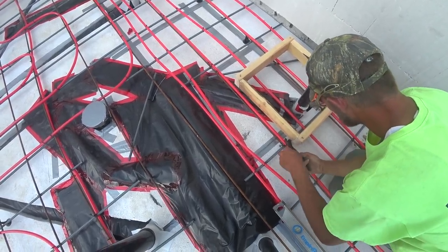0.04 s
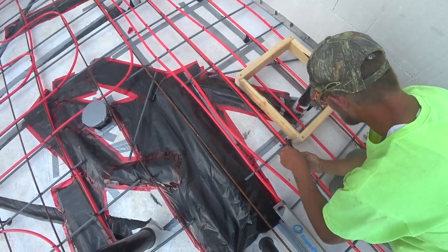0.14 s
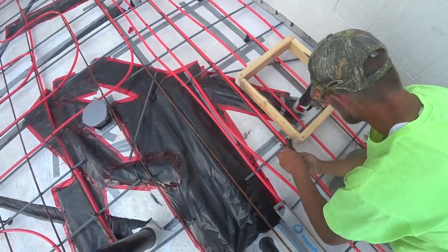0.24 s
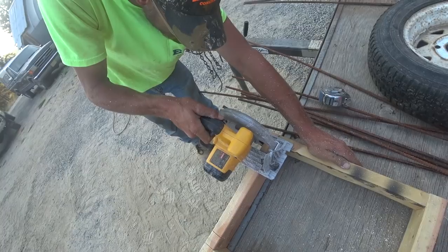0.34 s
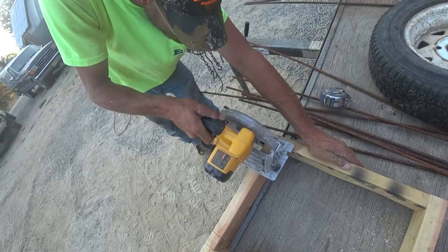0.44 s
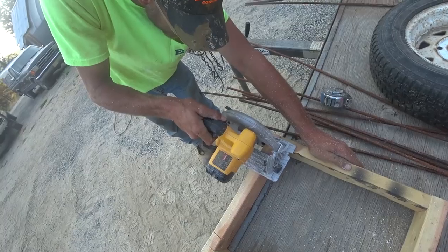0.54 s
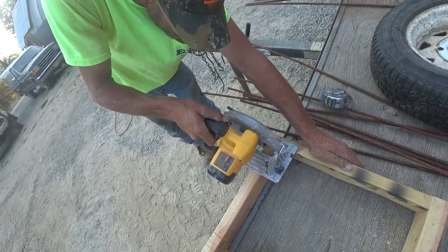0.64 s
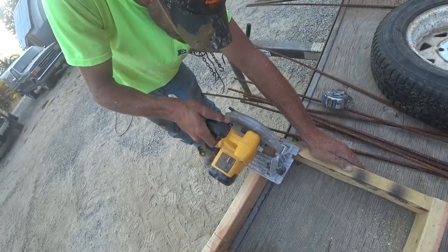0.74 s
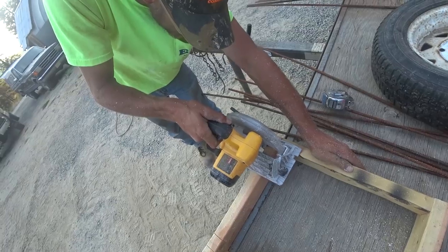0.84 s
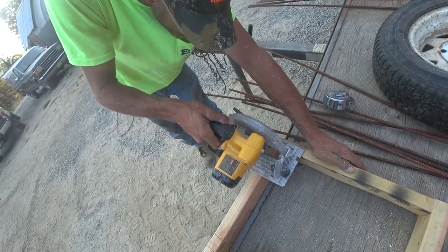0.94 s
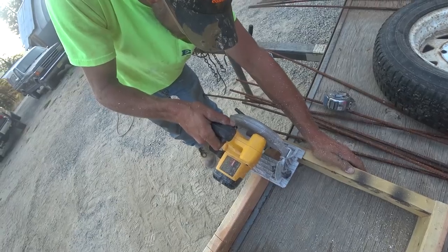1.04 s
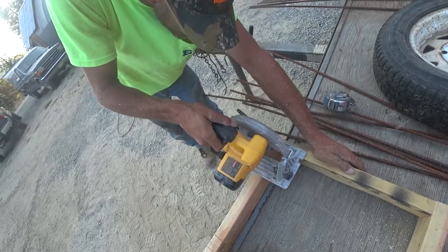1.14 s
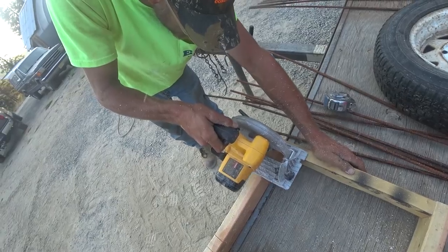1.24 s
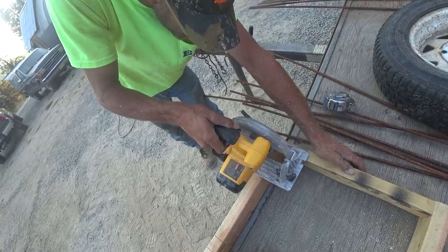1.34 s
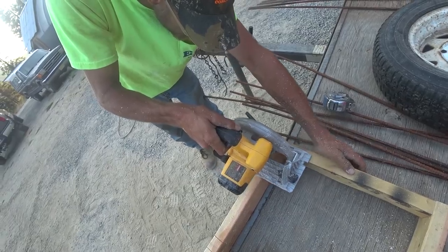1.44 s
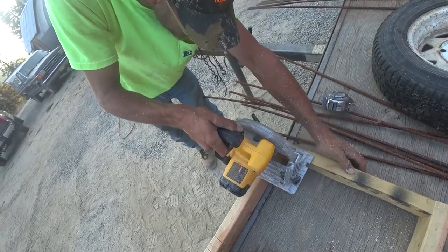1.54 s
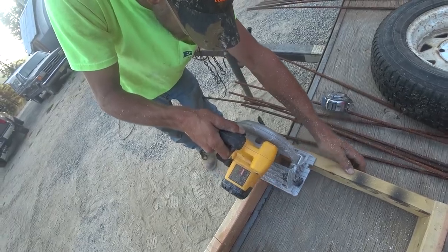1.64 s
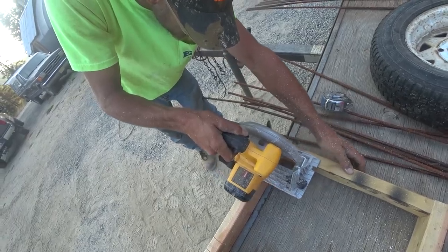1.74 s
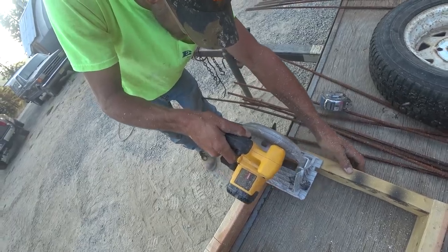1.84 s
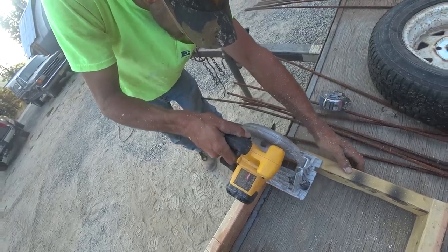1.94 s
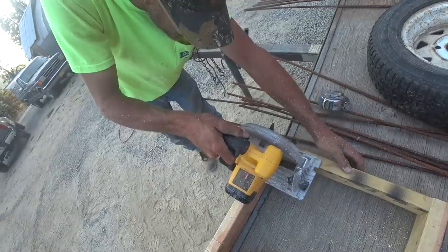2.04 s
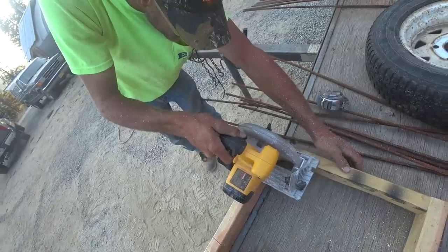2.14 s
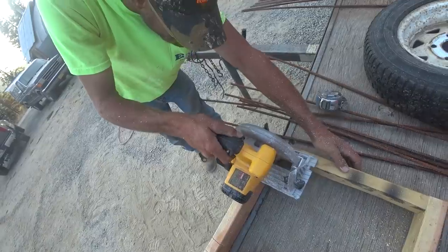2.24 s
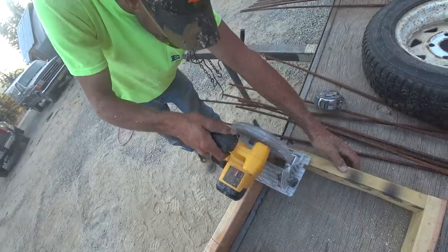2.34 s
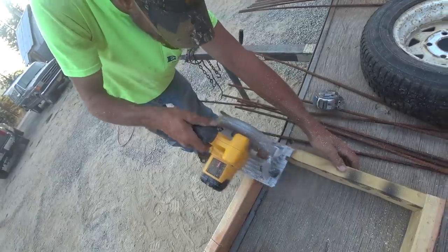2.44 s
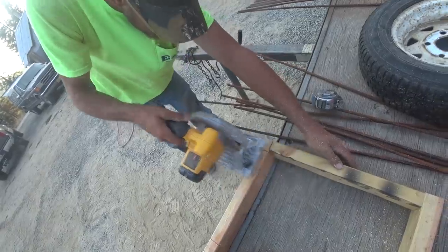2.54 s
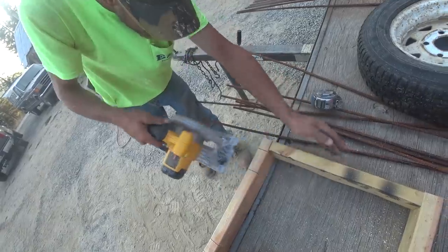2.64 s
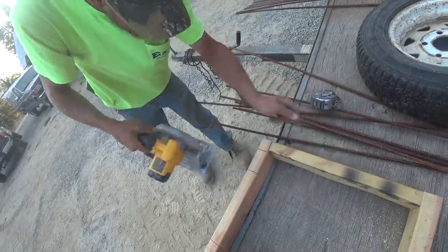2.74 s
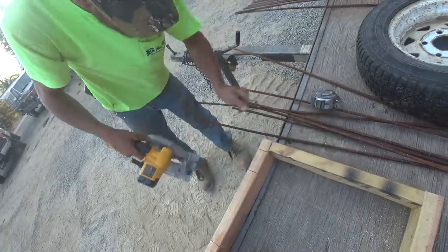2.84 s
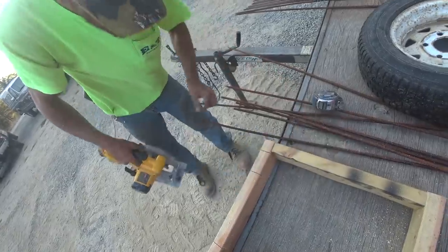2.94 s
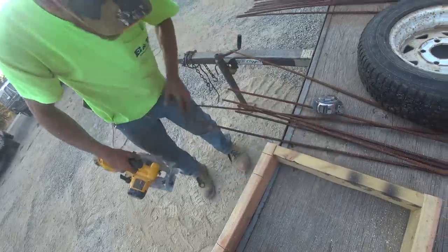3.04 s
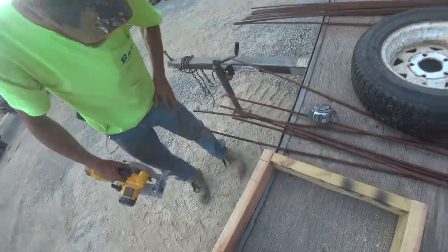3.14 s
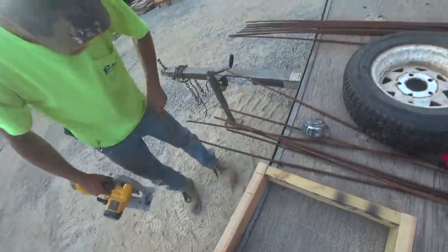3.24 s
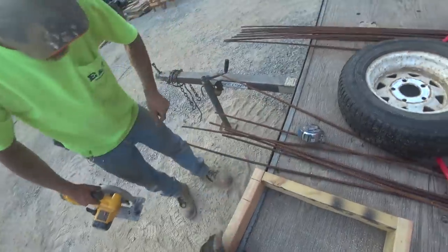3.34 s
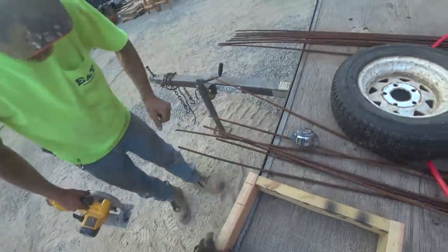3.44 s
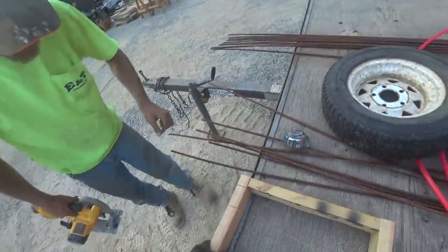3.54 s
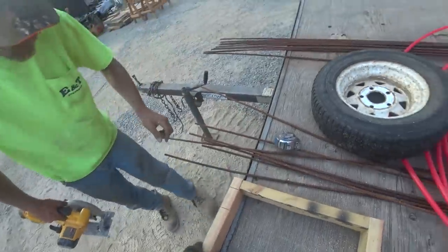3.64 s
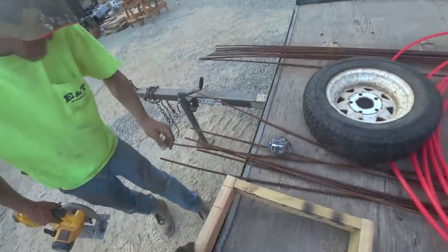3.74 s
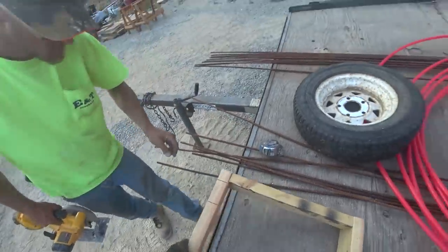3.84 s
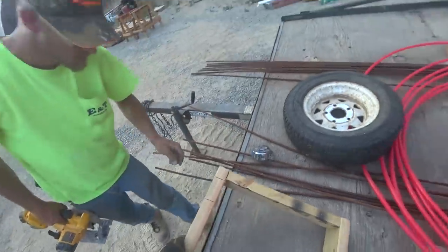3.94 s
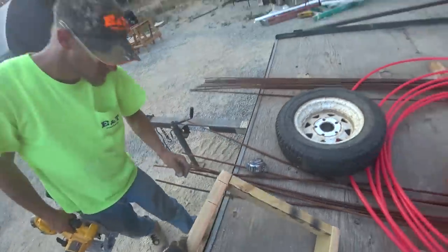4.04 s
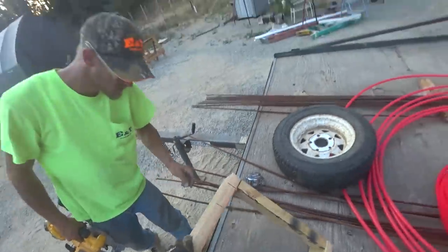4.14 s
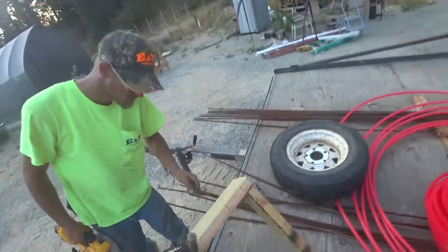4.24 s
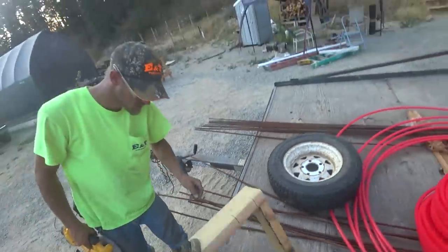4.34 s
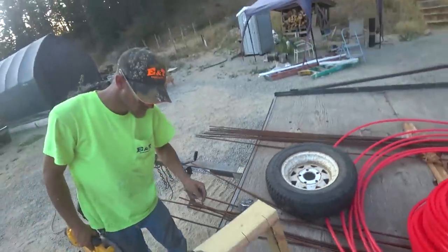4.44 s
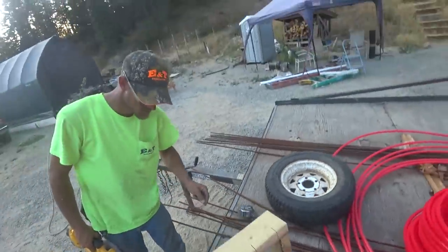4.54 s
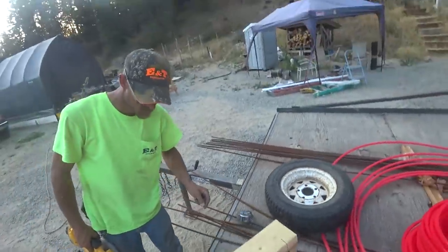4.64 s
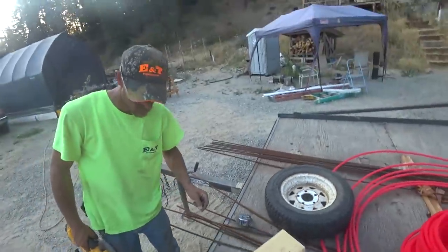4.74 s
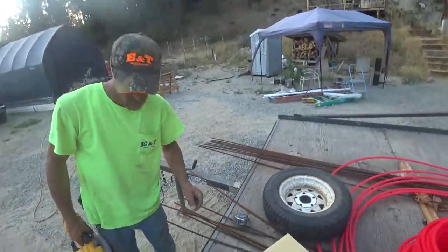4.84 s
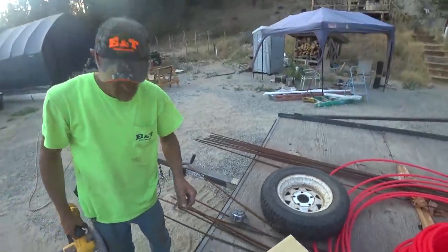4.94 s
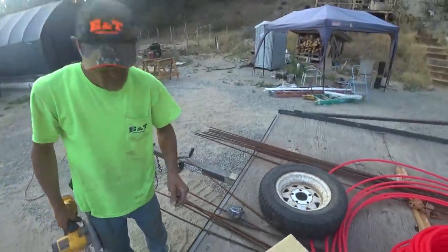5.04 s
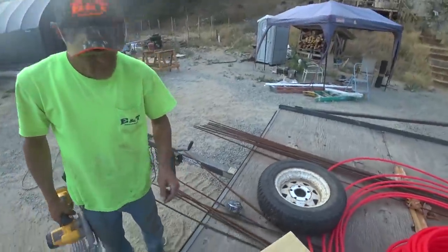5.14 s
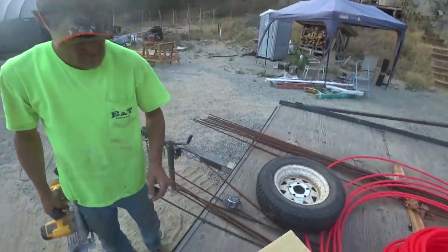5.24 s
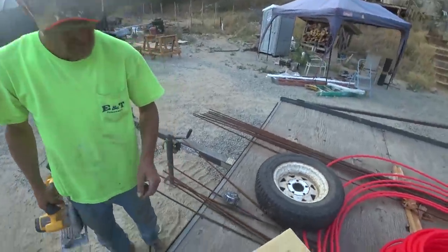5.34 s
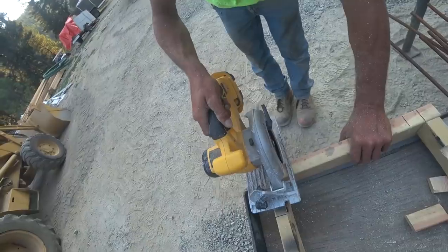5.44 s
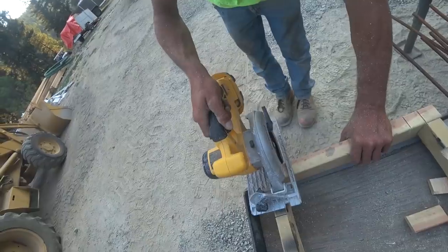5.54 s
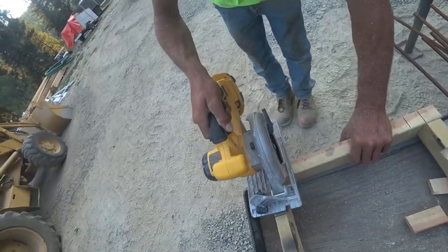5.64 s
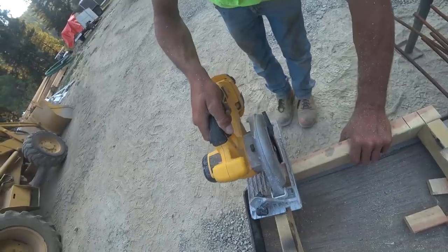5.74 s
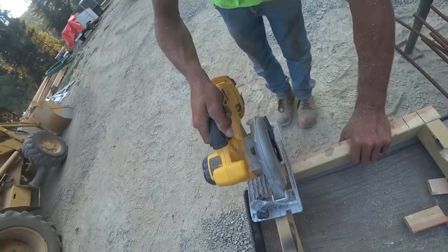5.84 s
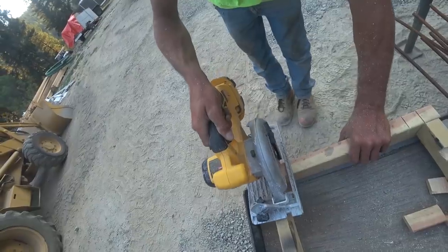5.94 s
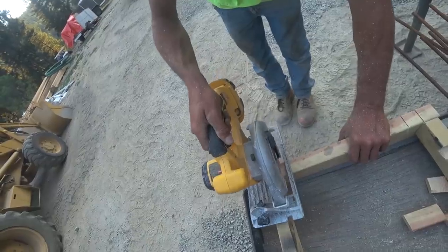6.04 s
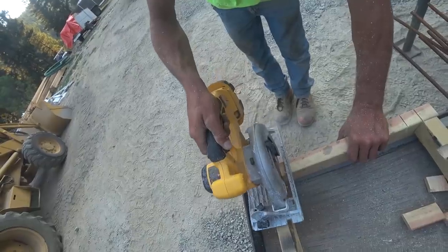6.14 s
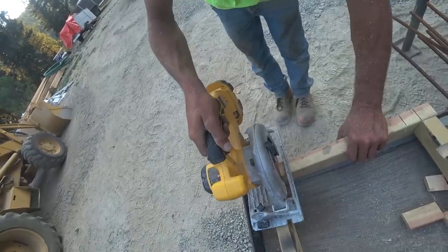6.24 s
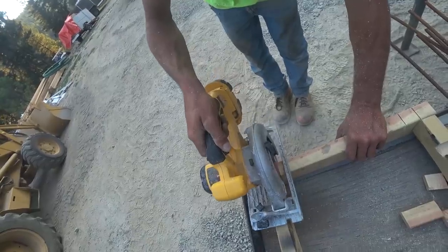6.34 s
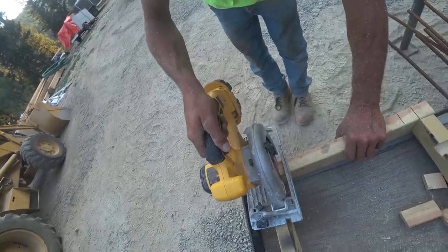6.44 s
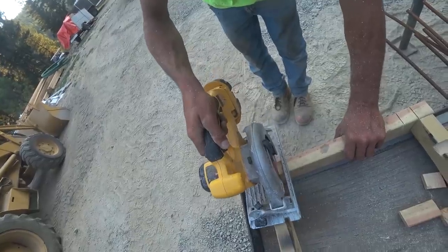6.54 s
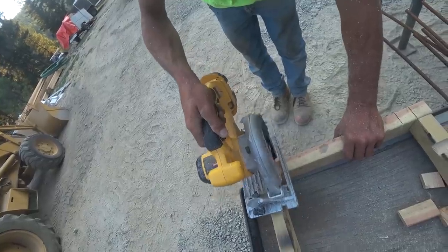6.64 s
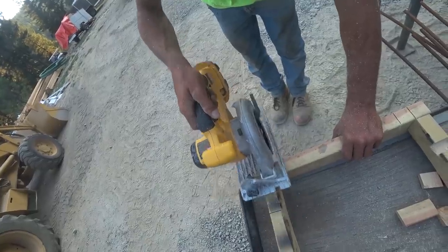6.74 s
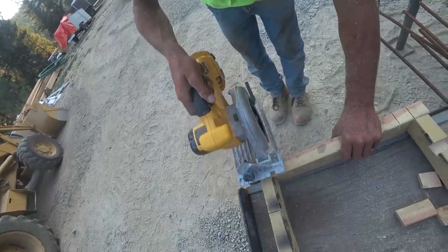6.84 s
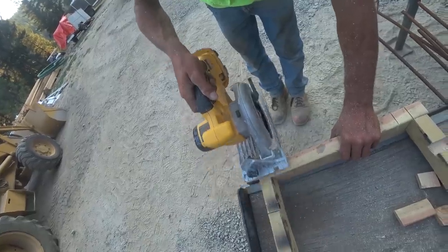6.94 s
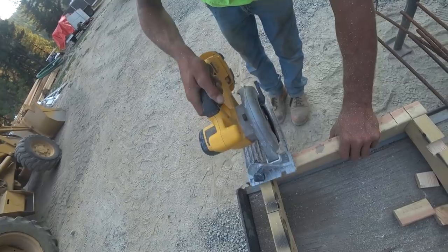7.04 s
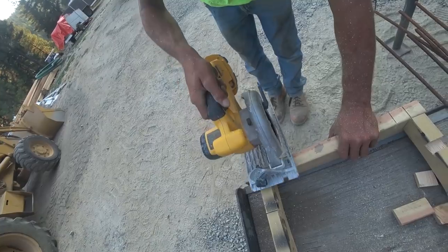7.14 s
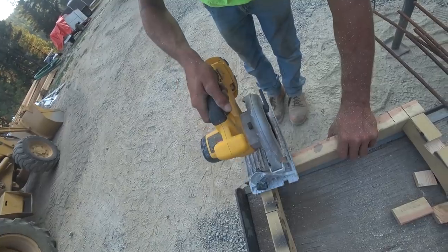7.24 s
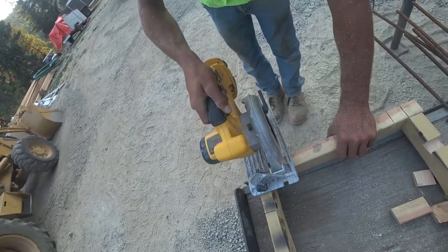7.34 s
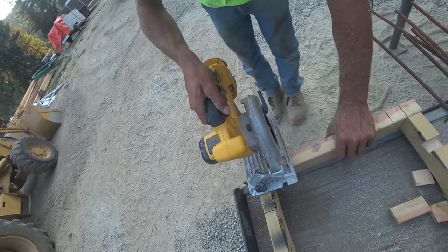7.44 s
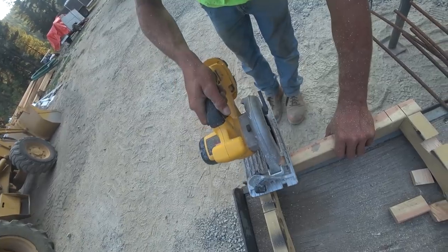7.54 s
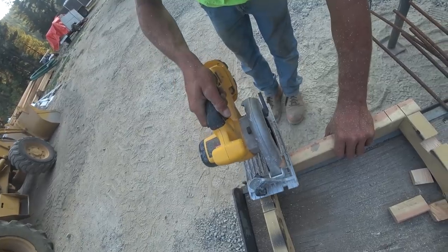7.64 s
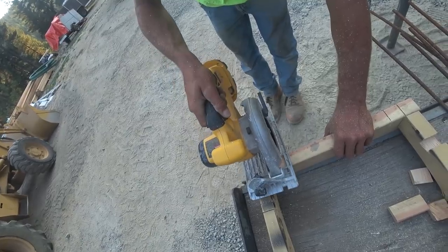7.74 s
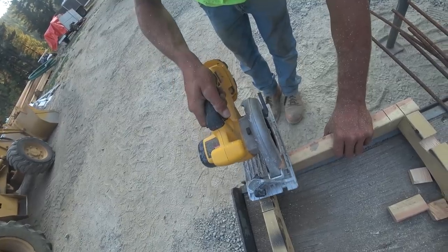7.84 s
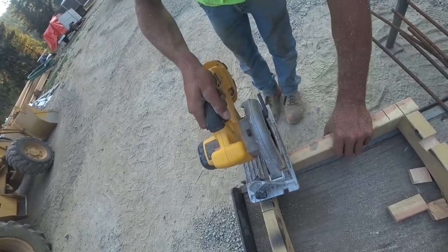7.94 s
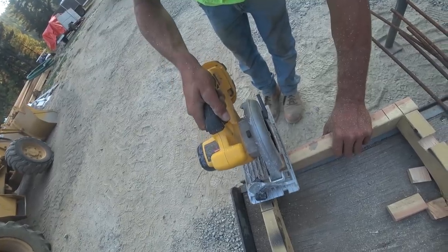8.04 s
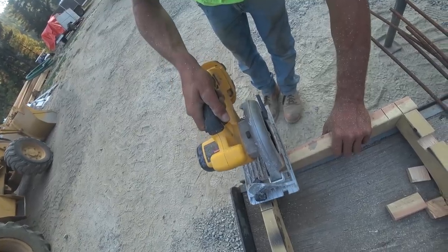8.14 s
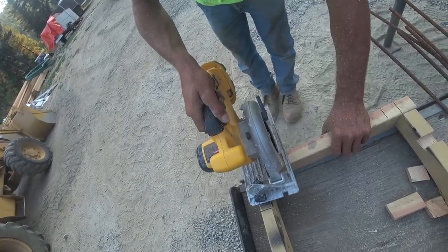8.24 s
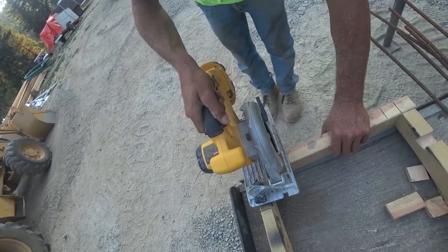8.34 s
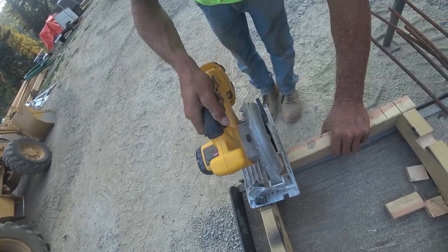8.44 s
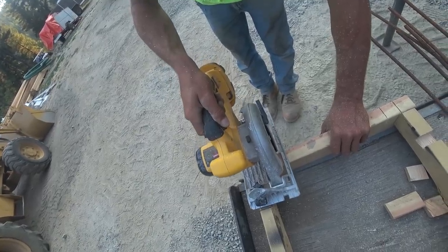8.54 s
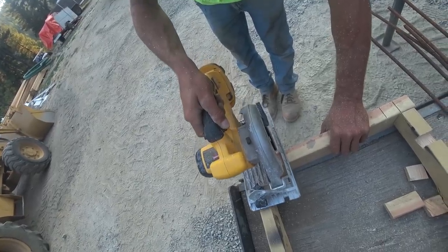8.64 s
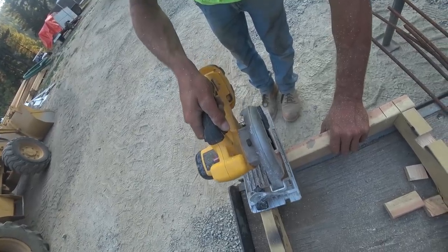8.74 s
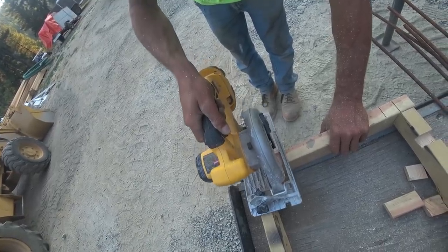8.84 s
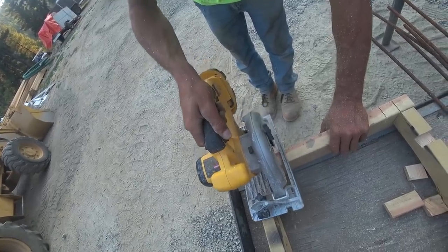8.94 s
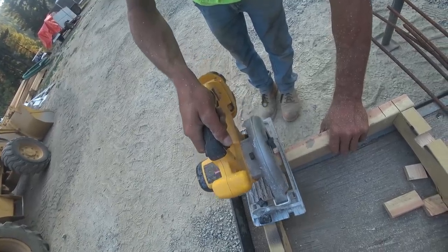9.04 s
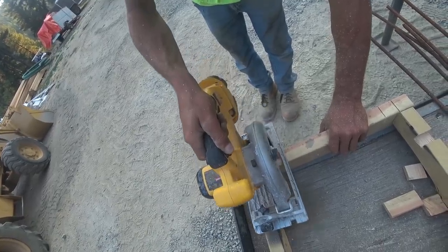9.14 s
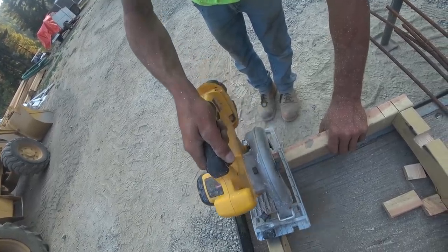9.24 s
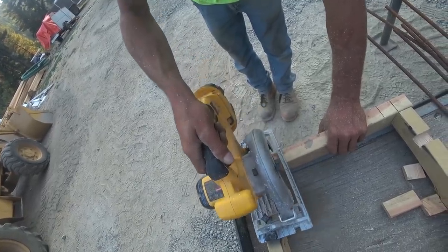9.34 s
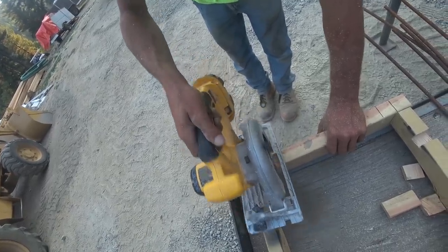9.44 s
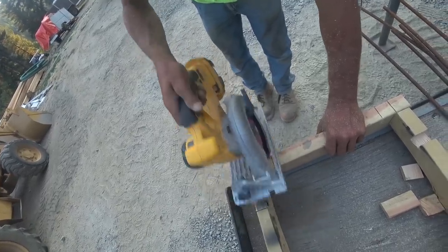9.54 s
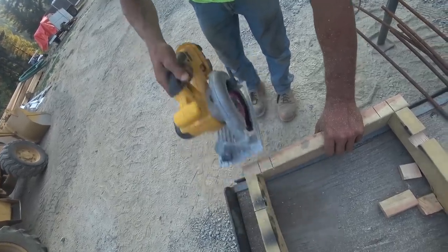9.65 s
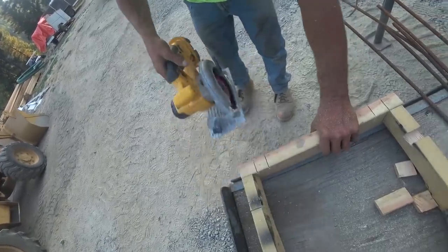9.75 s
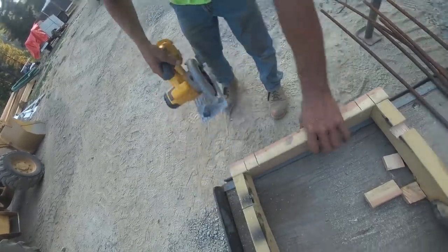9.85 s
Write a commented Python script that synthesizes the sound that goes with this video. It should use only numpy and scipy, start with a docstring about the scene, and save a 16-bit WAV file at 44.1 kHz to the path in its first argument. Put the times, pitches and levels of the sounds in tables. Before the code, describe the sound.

Close, harsh bursts of a handheld power saw biting wood, broken by hand rumble, rustling, rough board scrapes and offcuts knocking.

```python
"""In the open, by a trailer, an arm's length away: a cordless circular saw cuts three times through short boards.
A hand-held camera with two close microphone ports hears it. Clatter repeating with blade and shaft, mixed with
noise, makes the chip spray, rings the blade and drones in the housing; wavering tones are gear whine and teeth.
Between cuts there are hand rumble and body thuds, a grainy rustle of cloth and gravel, a board scraping in
rough slips, offcuts knocking, dry ticks and faint tones. Stretches start and stop abruptly."""
import sys
import numpy as np
from scipy import signal
from scipy.fft import rfft, irfft
from scipy.io import wavfile
from scipy.ndimage import uniform_filter1d, map_coordinates

SR = 44100
rng = np.random.default_rng(int(sys.argv[2]) if len(sys.argv) > 2 else 0)


def file_out(sig):
    """Save sig as 16-bit WAV at sys.argv[1]."""
    # one column per channel
    cols = np.atleast_2d(sig).T
    # limit, then scale
    lim = np.clip(cols, -1, 1)
    pcm = np.round(lim * 32767).astype(np.int16)
    wavfile.write(sys.argv[1], SR, pcm)


N = 435708
T = np.arange(N) / SR
HZ = np.maximum(np.arange(N // 2 + 1) * SR / N, 1)

# The cuts. Each row: heard from in seconds, teeth bite in seconds, trigger released in seconds, chip level in dB,
# blade ring minus chips in dB, housing minus chips in dB, braking in dB per second.
CUTS = [(0.339, 0.34, 2.318, -20, -10.5, -22, -300), (5.443, 5.06, 6.575, -20, -14.5, -25.5, -260),
        (7.496, 7.7, 9.385, -19.5, -13.5, -25, -480)]
# Saw speed under load, one list per cut. Each row: time in seconds, gear mesh in Hz, whine level in dB.
SPEED = [
    [(0.339, 2377, -30), (0.44, 2527, -35), (0.58, 2570, -39), (0.78, 2504, -35.5), (1.013, 2312, -35),
     (1.349, 2162, -31), (1.518, 2098, -36), (1.686, 2178, -35.5), (1.855, 2381, -46.5), (2.192, 2529, -42),
     (2.36, 2486, -75.5)],
    [(5.444, 2368, -36.5), (5.612, 2239, -35), (5.948, 2048, -49.5), (6.116, 2043, -40.5),
     (6.284, 2254, -35.5), (6.452, 2395, -32), (6.62, 2455, -50)],
    [(7.495, 2520, -31.5), (7.76, 2520, -25), (7.917, 2505, -33), (8.053, 2399, -36), (8.6, 2164, -37.5),
     (8.873, 1978, -41), (9.01, 2019, -32.5), (9.147, 2235, -41), (9.283, 2516, -41), (9.42, 2460, -45)],
]
# Chip spray colour, one list per span. Each row: frequency in Hz, density in dB per Hz.
SPRAY_COLOURS = [
    [(940, -48), (1600, -7.5), (2190, -7.5), (3950, -10), (4750, -4.5), (5240, -7.5), (6510, -1.5),
     (7900, -1), (8700, -6), (9400, -1), (11000, 1.5), (14300, -36)],
    [(940, -50.5), (1600, -14.5), (2320, -12), (2640, -18.5), (3030, -9.5), (4080, -14), (6460, -6.5),
     (11000, -1.5), (14300, -41)],
    [(1530, -27), (2600, -6), (3330, -18.5), (6710, 0), (7700, -10), (11000, -10.5), (14300, -51.5)],
    [(940, -52.5), (1600, -6.5), (2770, -8.5), (3050, -1), (3700, -6.5), (5370, -6.5), (7230, 1.5),
     (8500, -0.5), (9500, 3), (11000, 4.5), (14300, -40.5)],
]
# When each spray colour holds; the third is the spin-up before the bite. Each row: from and to in seconds.
SPRAY_SPANS = [(0, 3), (5, 7), (7, 7.7), (7.7, 10)]
# Blade modes below and above 2 kHz. Each row: frequency in Hz, level in dB, t60 in seconds.
LOW_BLADE_MODES = [(951.8, -6, 0.088), (1027, -11.5, 0.04), (1390, -0.5, .14), (1427, -8, .08),
                   (1470, -5.5, 0.075), (1570, -13, 0.1)]
HIGH_BLADE_MODES = [(2310, -30, 0.13), (3040, -26, .08), (3090, -27.5, 0.14), (3480, -25.5, 0.15),
                    (4280, -31, 0.14), (4820, -28, 0.04), (5710, -27.5, 0.14), (6400, -24, 0.079),
                    (6550, -18, 0.079), (7210, -20, .05), (7900, -20, 0.046), (9320, -20.5, 0.053),
                    (9800, -16.5, 0.13), (10100, -23.5, 0.041), (10760, -13, 0.041)]
# Housing drone colour. Each row: frequency in Hz, density in dB per Hz.
HOUSING_COLOUR = [(30, -27.5), (50, -19), (90, -28), (150, -21), (380, -12.5), (700, -14), (1000, -11.5),
                  (1400, -18.5), (2500, -32)]
# Gear mesh sidebands, a row per cut: one shaft turn below and one above the mesh, in dB against the chips.
SIDEBANDS = [(-25, -26), (-30, -16), (-17.5, -19)]
# Spin-up sidebands: one shaft turn below, one above and two above the mesh, in dB against the whine.
SPIN_UP_SIDEBANDS_DB = (-16, -13.5, -16.5)
# Tooth overtones singing out. Each row: from and to in seconds, overtone number, level in dB.
SINGING = [ (0.364, 0.825, 6, -29.5), (0.854, 1.45, 1, -45), (1.05, 1.5, 2, -40), (8.0, 8.901, 2, -45),
           (0.854, 1.458, 6, -27.5), (0.92, 1.36, 4, -33), (0.898, 1.097, 8, -24.5), (0.92, 1.4, 0.67, -45),
           (0.96, 1.299, 3, -34), (1.28, 1.396, 7, -30), (1.54, 1.85, 6, -29), (5.44, 5.849, 8, -31.5),
           (5.44, 5.7, 7, -27.5), (5.496, 5.62, 6, -32.5), (5.45, 5.62, 4, -35.5), (6.248, 6.503, 8, -26.5),
           (7.72, 7.97, 3, -35), (7.75, 8.25, 8, -27), (8.198, 8.48, 8, -29), (8.42, 8.624, 7, -23),
           (8.677, 9.102, 7, -26), ]
# Colour of the braked motor's shudder. Each row: frequency in Hz, density in dB per Hz.
GROAN_COLOUR = [(80, -22.5), (160, -1.5), (420, 0.5), (800, -22)]
# Shudder level in dB, a value per cut.
GROANS_DB = [-43.5, -46, -42.5]
# Blade and guard ringing on as the saw leaves the wood. Each row: start in seconds, frequency in Hz, peak in dB
# before the guard damps it, decay time constant of the shaking in seconds, t60 in seconds.
FREE_RINGS = [ (2.33, 3486, -35, .05, .25), (2.33, 3227, -33, .03, .3), (2.545, 1560, -25, .015, .08),
              (2.33, 7714, -42, 0.032, 0.2), (2.45, 1520, -38, 0.15, 0.063), (2.478, 2910, -45, .01, .04),
              (6.565, 2580, -21, .015, 0.048), (6.59, 4280, -28.5, .03, 0.38),
              (6.639, 2520, -36, .03, 0.18), (6.65, 3196, -43, .04, 0.22), (6.68, 1560, -35, 0.11, 0.065),
              (6.681, 242, -37.5, 0.078, 0.052), (9.375, 2445, -28, .025, 0.45),
              (9.375, 3480, -26.5, 0.029, .3), (9.4, 3055, -38, .04, .2), (9.53, 6300, -52, .01, .12),
              (9.42, 1388, -43.5, .06, 0.13), ]
# Thuds on the camera body. Each row: start in seconds, level in dB, pitch in Hz, shell rattle in dB against
# the swing, shell motion at the right port as a share of the left (clipped to +-1).
BUMPS = [(3.118, -28.5, 84.5, -4, 0.22), (3.612, -33, 193, 2, 0.82), (3.707, -21.5, 61.9, 0, 0.15),
         (3.763, -13, 153, 4, -0.87), (3.782, -13, 210, 6, -0.61), (3.797, -11.5, 300, 1, -0.76),
         (3.926, -22.5, 129, 0.5, 0.38), (3.957, -16.5, 99, -14, 0.013), (4.204, -25, 67.3, -0.5, 0.74),
         (4.289, -19, 122, -3.5, 0.95), (4.423, -13.5, 117, -1.5, 0.68), (5.389, -6, 113.2, 3.5, 0.62),
         (5.41, -7.5, 71, -7.5, 0.82), (7.295, -25.5, 60.7, -11.5, 1)]
# Wood knocks. Each row: start in seconds, body peak in dB, crack in dB against the body,
# pitch factor for the size, rattle decay in seconds.
KNOCKS = [(0.095, -24, -7, 1.04, 0.013), (2.539, -20, -34, 0.89, 0.017), (2.601, -34.5, -33, 0.93, 0.015),
          (3.391, -30, -14, 1.18, 0.03), (5.015, -16.5, -26, 1.44, 0.005), (5.313, -25, -11, 1.57, 0.013),
          (5.389, -12.5, -18, 1.135, 0.0049), (6.797, -23.5, -25, 0.97, 0.023),
          (6.848, -39, -30, 1.04, 0.012), (7.301, -27, -25, 1.1, 0.02), (7.345, -25.5, -21, 1.85, 0.023),
          (9.63, -13.5, -10, 1.03, 0.012), (9.649, -21.5, -11, 1.55, 0.025), (9.695, -26, -21, 1.02, 0.018)]
# Modes of a board. Each row: frequency in Hz, level in dB, t60 in seconds; each knock varies pitch and level.
WOOD_MODES = [(610, 2, 0.051), (784, -1.5, 0.029), (909, 4.5, 0.048), (1020, -12.5, 0.032),
              (1440, 0.5, 0.1), (1610, -1, 0.019), (2070, -5, 0.019), (3050, -9.5, 0.022)]
# Dry ticks of grit and trigger. Each row: start in seconds, peak in dB.
TICKS = [(2.5134, -42), (3.1208, -33.5), (3.676, -26), (3.706, -20.5), (3.9313, -24), (4.0447, -32),
         (5.238, -45), (6.641, -24), (6.7391, -32), (7.464, -41), (7.4869, -10), (9.5087, -35),
         (9.5961, -36.5), (9.717, -44)]
# Faint tones in the quiet. Each row: from and to in seconds, start and end pitch in Hz, level in dB.
QUIET_TONES = [(0.12, .21, 3150, 2900, -62), (6.855, 7.284, 3044, 3090, -81.5),
               (9.73, 9.88, 2370, 2300, -79.5)]
# Slips of a board over the deck. Each row: start in seconds, peak in dB, added level of modes under 2 kHz in dB.
SLIPS = [(3.958, -33, -8), (4.012, -34, -10), (4.134, -26.5, -12), (4.166, -26, -3.5), (4.19, -13.5, -1.5),
         (4.224, -21, -9), (4.239, -21, 13.5), (4.257, -18, 2), (4.285, -16, -2), (4.301, -17.5, 2.5),
         (4.329, -23, 14), (4.359, -18.5, 4), (4.387, -21.5, -0.5), (4.412, -23, -8), (4.427, -19.5, -9)]
# Deck modes. Each row: frequency in Hz, width in Hz, level in dB.
DECK_MODES = [(1185, 50, 0.5), (1495, 38, -7), (2340, 72, -4), (2653, 63, -9.5), (3350, 99, -11),
              (3906, 120, -2), (4320, 150, -7), (5350, 390, -6)]
# Handling, one list per stretch. Each row: time in seconds, levels of hand rumble, mid rustle and treble
# rustle in dB.
HANDLING = [
    [(0.0, -60, -47.5, -69), (0.162, -63, -47.5, -64), (0.337, -64, -50, -72)],
    [(2.4, -61, -57, -55), (2.57, -55, -51.5, -62), (2.66, -55.5, -56.5, -86), (2.95, -43, -66.5, -75.5),
     (3.37, -50, -43, -58), (3.64, -33, -53, -46), (3.84, -26.5, -45.5, -52), (4.0, -38.5, -40, -43),
     (4.23, -34.5, -47, -35.5), (4.35, -29, -41, -34), (4.47, -27.5, -47.5, -33.5), (4.66, -42, -39.5, -53),
     (4.87, -40, -44.5, -44), (5.09, -42.5, -44.5, -58), (5.3, -35, -49.5, -71), (5.44, -31, -39.5, -48.5)],
    [(6.64, -64, -45, -50), (6.74, -62, -42, -48), (6.828, -60, -45.5, -68), (6.968, -71, -67.5, -83),
     (7.283, -75, -68.5, -86)],
    [(7.287, -75.5, -37, -61.5), (7.335, -59.5, -39.5, -58.5), (7.36, -59, -39.5, -60),
     (7.395, -51, -54, -76), (7.484, -47, -53, -65)],
    [(9.47, -61, -48, -57), (9.582, -68, -55.5, -59), (9.718, -66, -59, -73), (9.88, -78.5, -69.5, -84)],
]
# Fade-in of each handling stretch, in seconds.
FADE_IN_S = [.001, .08, .08, .006, .06]
# Colours of hand rumble and rustle. Each row: frequency in Hz, density in dB per Hz.
RUMBLE_COLOUR = [(15, -13), (25, 8.5), (110, 4.5), (300, -9), (500, -33), (900, -52.5)]
RUSTLE_COLOUR = [(150, -23.5), (300, -8), (560, -11), (1130, -14), (7600, -22.5), (11000, -31)]
# Phase between the ports. Each row: frequency in Hz, lead of the left in radians.
PORT_LEAD = [(60, 0), (600, -0.7), (1600, -0.4), (5250, -0.5), (10000, -0.3)]
# Level between the ports. Each row: frequency in Hz, left minus right in dB.
PORT_TILT = [(300, -0.1), (1130, -0.4), (2020, -1), (3640, -0.5), (6540, -3.5), (11000, -0.6)]
# Scatter, opposite in sign at the two ports. Each row: frequency in Hz, level in dB.
SCATTER = [(60, -12.5), (500, -18), (1200, -15.5), (4000, -15), (11000, -20.5)]

GEAR_TEETH, PINION_TEETH, BLADE_TEETH = 46, 9, 24
SLOTS = 4  # the blade repeats itself this often a turn
SLOT_OVERTONE = 2 / 3  # of the tooth rate: sixteen a turn, where the slots also sing
TRIGGER_S = 7.47  # the one start from rest
SPIN_UP_S, SPIN_UP_SHAPE = .109, 1.27  # motor time constant and its soft start
WIND_UP_S, RUN_DOWN_S = 0.035, .25  # rise of the noise; longest sound after the trigger is released
BITE_DB, BITE_S = 1.5, 0.11  # the first contact is louder; its decay
RING_SAG_DB_S, HOUSING_SAG_DB_S = -4.5, -4  # the kerf grips the blade as it goes deeper
EXIT_DB, EXIT_S = 4.5, 0.087  # ring and housing come free just before the end
RING_BRAKE_DB_S, HOUSING_BRAKE_DB_S = -200, -120
COAST_DB, COAST_DB_S = -34.5, -130  # a last rattle outlasts the quick stop
FREE_RING_DB, FREE_HOUSING_DB, SPIN_UP_WHINE_DB = -1.5, 7, 11  # before the teeth bite
IDLE_MESH_HZ = 2520
SIDEBAND_DB_PER_HZ = 0.3  # the sidebands sink as the load slows the saw
MIDDLE_DB_PER_HZ = 0.0129  # so does the spray under 6 kHz
LINGER_DB_S, LINGER_S = 110, .06  # under the brake it also dies more slowly than the top
BEAT_BELOW_HZ = 3350  # under this the clatter is locked to the blade turn
WHINE_FROM_S = 7.515
STEADY_HZ, STEADY_DB = 1399, -4.5  # a blade mode that sings on; dB against the ring level
SING_FADE_S, OVERTONE_FLOOR_DB = 0.093, -27.5  # floor: against the chips
GROAN_S = .14
FREE_FOR_S, DAMPED_S = 0.12, 0.054  # free rings, until the closing guard stills them; decay constant
BUMP_CYCLES = 14.4  # swings until a thud has died by 60 dB
THUDS_STOP_S = 5.444  # earlier thuds are cut off here
DRAG_FROM_S, DRAG_FADES_S, DRAG_DB = 4.18, 4.41, -40.5  # steady rubbing under the slips
TOP_HZ = 11000


def saw():
    """The main source: clatter and chip noise strike the blade and housing, with gear and tooth tones over them."""
    gate, chips_db, ring_db, housing_db, free = cutting()
    (loaded_mesh, whine_db), spinning = play(SPEED)
    since_trigger = abs(T - TRIGGER_S)
    spin_up = 1 - np.exp(-(since_trigger / SPIN_UP_S) ** SPIN_UP_SHAPE)
    mesh = loaded_mesh * np.where(T > TRIGGER_S, spin_up, 1)
    turn = mesh / GEAR_TEETH
    shaft = mesh / PINION_TEETH
    bite = gate * undb(chips_db + .8 * walk(25))
    clatter = turning_clatter(turn, shaft)
    strikes = tooth_strikes(bite, clatter)
    driven_db = whine_db + SPIN_UP_WHINE_DB * uniform_filter1d(free * gate, size=800)
    lines = gear_whine(mesh, turn, shaft, driven_db, chips_db, free, spinning)
    lines += tone(3 * turn, chips_db + housing_db - 15.5, 1.8)
    steady_hz = np.full(N, STEADY_HZ) + 8.7 * walk(6)
    lines += ~free * tone(steady_hz, chips_db + ring_db + STEADY_DB, 1.7)
    lines += ~free * singing(turn * BLADE_TEETH, chips_db)
    body = chip_spray(strikes, loaded_mesh) + blade(strikes, ring_db) + housing(bite, clatter, housing_db)
    return body + sum(spinning) * lines + groan() + free_rings()


def cutting():
    """Levels of chips, blade ring and housing: wind up, hold while the kerf deepens, die under the brake."""
    current = np.clip(np.searchsorted(np.array(CUTS)[:, 0], T) - 1, 0, None)
    start, bite, stop, chips, blade_db, body_db, brake = (np.array(column)[current] for column in zip(*CUTS))
    depth_s = np.clip(T, bite, stop) - bite
    braked_s = np.maximum(T - stop, 0)
    free = T < bite
    brake_db = np.maximum(brake * braked_s, COAST_DB + COAST_DB_S * braked_s)
    exit_db = EXIT_DB * np.clip(1 + (T - stop) / EXIT_S, 0, 1)
    wind_up = np.where(free, np.clip((T - start) / WIND_UP_S, .1, 1), 1)
    gate = (T >= start) * (braked_s < RUN_DOWN_S) * wind_up
    chips_db = chips + brake_db + BITE_DB * ~free * np.exp(-depth_s / BITE_S)
    # ring and housing are relative to the chips, so the chips' braking is taken off again
    ring_db = blade_db + RING_SAG_DB_S * depth_s + RING_BRAKE_DB_S * braked_s + FREE_RING_DB * free
    housing_db = body_db + HOUSING_SAG_DB_S * depth_s + HOUSING_BRAKE_DB_S * braked_s + FREE_HOUSING_DB * free
    return uniform_filter1d(gate, size=40), chips_db, ring_db + exit_db - brake_db, housing_db + exit_db - brake_db, free


def turning_clatter(turn, shaft):
    """Teeth and gear flanks all differ a little, so part of the clatter repeats with blade and motor shaft."""
    by_blade = repeating(turn, count=1200, change=2.5)
    by_shaft = repeating(shaft, count=240, change=3.5)
    by_slot = repeating(SLOTS * turn, count=300, change=2.2)
    return unit(by_blade + 0.4 * by_shaft + .6 * by_slot)


def tooth_strikes(bite, clatter):
    """The force of the teeth: mostly repeating clatter at low frequencies, mostly random spray at high ones."""
    spray = rng.standard_normal(N) * undb(0.99 * walk(900))
    low_share = 1 / (1 + (HZ / BEAT_BELOW_HZ) ** 4)
    low = rfft(unit(clatter + 0.49 * spray)) * np.sqrt(low_share)
    high = rfft(unit(0.42 * clatter + spray)) * np.sqrt(1 - low_share)
    return bite * irfft(low + high, N)


def chip_spray(strikes, loaded_mesh):
    """Flying chips: strikes coloured span by span, weaker in the middle as the load slows the saw."""
    chips = np.zeros(N)
    for (start_s, end_s), spectrum in zip(SPRAY_SPANS, SPRAY_COLOURS):
        chips += colour((T >= start_s) * (T < end_s) * strikes, spectrum, 2500, 11300)
    linger_db = 0
    for cut in CUTS:
        linger_db = linger_db + LINGER_DB_S * np.clip(T - cut[2], 0, LINGER_S) * (T < cut[2] + RUN_DOWN_S)
    load_db = MIDDLE_DB_PER_HZ * (loaded_mesh - IDLE_MESH_HZ)
    return patchy(chips, depth_db=1.0, rate=7., middle_db=load_db + linger_db)


def blade(strikes, ring_db):
    """The steel disc: strikes excite damped modes; the kerf's grip weakens only the lower ones."""
    modes = np.zeros(N)
    for hz, db, t60 in HIGH_BLADE_MODES:
        modes += ring(strikes * undb(2.0 * walk(9)), hz, t60) * undb(db)
    for hz, db, t60 in LOW_BLADE_MODES:
        modes += ring(strikes * undb(ring_db + 1.1 * walk(14)), hz, t60) * undb(db)
    return high_pass(modes, 4, 700)


def housing(bite, clatter, housing_db):
    """The housing drones as clatter and broadband noise shake it."""
    shaking = unit(clatter + 0.89 * rng.standard_normal(N))
    return colour(bite * undb(housing_db) * shaking, HOUSING_COLOUR, 170, 800)


def gear_whine(mesh, turn, shaft, driven_db, chips_db, free, spinning):
    """Gear mesh tone with sidebands a shaft turn apart; the wheel runs out of true, so it throbs each blade turn."""
    throb = 1 + 0.4 * repeating(turn, count=12, change=12.)
    chatter = ramp(WHINE_FROM_S, 0.014) * undb(1.8 * walk(400))
    rough = np.where(free, chatter, 1)  # unloaded gears chatter
    whine = tone(mesh, driven_db, np.where(free, 1., 1.6))
    octave = free * tone(2 * mesh, driven_db - 14.5, 3.5)
    lines = rough * throb * (whine + octave)
    spinning_up = (T > TRIGGER_S) * (T < CUTS[-1][1] + BITE_S)
    for order, db in zip((-1, 1, 2), SPIN_UP_SIDEBANDS_DB):
        lines += rough * spinning_up * tone(mesh + order * shaft, driven_db + db, 3.)
    side_db = chips_db + SIDEBAND_DB_PER_HZ * (mesh - IDLE_MESH_HZ)
    for on, (below_db, above_db) in zip(spinning, SIDEBANDS):
        below = tone(mesh - shaft, side_db + below_db, 2.0)
        above = tone(mesh + shaft, side_db + above_db, 1.5)
        lines += on * (below + above)
    return lines


def singing(tooth, chips_db):
    """Tooth overtones: a faint bed, and single ones that swell out of it for a while."""
    out = np.zeros(N)
    for order in (SLOT_OVERTONE, *range(1, 9)):
        level = undb(chips_db + OVERTONE_FLOOR_DB) * (order >= 1)
        for start_s, end_s, overtone, db in SINGING:
            if abs(overtone - order) < .2:
                fall = 1 - ramp(end_s - SING_FADE_S, SING_FADE_S)
                level = level + undb(db) * ramp(start_s, SING_FADE_S) * fall
        out += level * tone(order * tooth, 0, 2.4)
    return out


def groan():
    """The braked motor shudders: a short swell of low noise around each trigger release."""
    swells = sum(undb(db) * np.sin(np.pi * ramp(cut[2] - .02, GROAN_S)) for cut, db in zip(CUTS, GROANS_DB))
    return noise(GROAN_COLOUR, 150, 450) * swells


def free_rings():
    """Blade and guard modes, shaken by fading noise as the saw leaves the wood, then damped by the guard."""
    out, t = np.zeros(N), T[:SR // 2]
    guard = np.exp(-np.maximum(t - FREE_FOR_S, 0) / DAMPED_S)
    for s, hz, db, shaken_s, t60 in FREE_RINGS:
        shaking = rng.standard_normal(len(t)) * np.exp(-t / max(shaken_s, .002))
        rung = ring(shaking, hz, t60) * guard
        add(out, s, undb(db) * rung / abs(rung).max())
    return out


def bumps():
    """The camera shell thuds: a low swing and a rattle of higher shell modes that each port feels differently."""
    out, t = np.zeros((2, N)), T[:SR // 2]
    for s, db, hz, shell_db, share in BUMPS:
        push = rng.standard_normal((2, len(t))) * (np.exp(-t / 0.026) + 0.68 * np.exp(-t / 0.0056))
        share = np.clip(share, -1, 1)
        push = np.array([push[0], share * push[0] + np.sqrt(1 - share ** 2) * push[1]])
        shell = ring(push, 352, 0.044) + 0.44 * ring(push, 494, 0.021) + ring(push, 207, 0.03)
        swing = np.sin(2 * np.pi * hz * t) * 1000 ** (-t * hz / BUMP_CYCLES)
        thud = swing + undb(shell_db) * shell / abs(shell).max()
        if s < THUDS_STOP_S:
            thud[:, int((THUDS_STOP_S - s) * SR):] = 0
        add(out, s, undb(db) * thud * np.minimum(t / .004, 1))
    return out


def knocks():
    """Boards and offcuts knock: a fading rattle excites wood modes, a dull clack and a sharp crack."""
    out, t = np.zeros(N), T[:SR // 3]
    for s, db, crack_db, size, rattle_s in KNOCKS:
        rattle = rng.standard_normal(len(t)) * np.exp(-t / max(rattle_s, .002))
        soft = rattle * np.minimum(t / 0.0044, 1)
        body = 2.6 * ring(rattle * np.minimum(t / 0.001, 1), 1300 * size, 0.0012)  # the dull clack
        for hz, mode_db, t60 in WOOD_MODES:
            pitch_shift, level_shift = rng.standard_normal(2)  # each blow lands elsewhere
            mode_hz = hz * size * (1 + 0.015 * pitch_shift)
            body += ring(soft, mode_hz, t60) * undb(mode_db + 2 * level_shift)
        crack = undb(crack_db) * np.gradient(rattle) / 6.6
        add(out, s, undb(db) * (body / abs(body).max() + crack))
    return out


def ticks():
    """Grit and trigger tick: a few milliseconds of fading noise through a very short resonance."""
    out, t = np.zeros(N), T[:SR // 3]
    for s, db in TICKS:
        tick = ring(rng.standard_normal(len(t)), 4500, 0.00015) * np.exp(-t / 0.0085)
        add(out, s, undb(db) * tick / abs(tick).max())
    return out


def quiet_tones():
    """Faint gliding tones of unsteady pitch and strength."""
    out = np.zeros(N)
    for start_s, end_s, start_hz, end_hz, db in QUIET_TONES:
        glide = np.interp(T, [start_s, end_s], [start_hz, end_hz]) + 8 * walk(150)
        on = uniform_filter1d(1. * (T > start_s) * (T < end_s), size=400)
        out += tone(glide, db, 0.87) * on
    return out


def scrape():
    """A dragged board: each slip shakes the deck with a short rough burst, over a steady uneven rub."""
    out, t = np.zeros(N), T[:SR // 5]
    first_mode = np.arange(len(DECK_MODES)) == 0
    for s, db, low_db in SLIPS:
        slip = rng.standard_normal(len(t)) * (np.exp(-t / 0.0075) + 0.2 * np.exp(-t / 0.032))
        # the contact point moves; the first grip rings lower
        grip = 0.07 * np.exp(-abs(s - DRAG_FROM_S) / .025) * first_mode
        drift = 1 - grip + 0.017 * rng.standard_normal(len(DECK_MODES))
        burst = deck(slip, drift, low_db)
        add(out, s, undb(db) * burst / abs(burst).max())
    rub = rng.standard_normal(N) * undb(3.4 * walk(120))
    rubbing = unit(deck(rub, np.ones(len(DECK_MODES)), -2.5))
    return out + undb(DRAG_DB) * ramp(DRAG_FROM_S, .03) * (1 - ramp(DRAG_FADES_S, 0.086)) * rubbing


def deck(x, drift, low_db):
    """Deck modes shaken by friction, each shifted by its drift factor, plus the bare hiss of the contact."""
    out = 0.55 * np.gradient(x)
    for (hz, width, db), shift in zip(DECK_MODES, drift):
        out += ring(x, hz * shift, 2.8 / width) * undb(db + low_db * (hz < 2000))
    return out


def handling():
    """Rumble of hands on the camera, partly different at each port, and a grainy rustle of cloth and gravel."""
    (rumble_db, mid_db, treble_db), gates = play(HANDLING)
    heard = np.zeros(N)
    for gate, rows, fade_s in zip(gates, HANDLING, FADE_IN_S):
        heard += gate * ramp(rows[0][0], fade_s)
    grains = noise(RUSTLE_COLOUR, 300, 1800) * undb(2.8 * np.tanh(walk(30)) + 1.6 * walk(300))
    mid_share = 1 / (1 + (HZ / 1900) ** 4)
    mid, treble = (irfft(rfft(grains) * share, N) for share in (mid_share, 1 - mid_share))
    rustle = unit(mid) * undb(mid_db) + unit(treble) * undb(treble_db)
    both, apart = (noise(RUMBLE_COLOUR, 25, 250) for _ in range(2))
    rumble = (both + 0.29 * apart * np.array([[1], [-1]])) * undb(rumble_db + 4.54 * walk(14))
    return heard * rustle, heard * rumble


def undb(db):
    """Decibels to gain."""
    return 10 ** (np.asarray(db) / 20)


def unit(x):
    """Scale to rms 1."""
    return x / np.sqrt(np.mean(x ** 2))


def along(points):
    """A (Hz, value) table read at every frequency, straight over log frequency."""
    hz, value = np.transpose(points)
    return np.interp(np.log(HZ), np.log(np.maximum(hz, 1)), value)


def colour(x, spectrum, low_hz, high_hz):
    """Filter to a spectrum; white noise of rms 1 comes out with rms 1 between low_hz and high_hz."""
    gain = undb(along(spectrum))
    band_rms = np.sqrt(np.mean(gain ** 2 * (HZ > low_hz) * (HZ < high_hz)))
    return irfft(rfft(x) * gain, N) / band_rms


def noise(spectrum, low_hz, high_hz):
    """Coloured noise with rms 1 between low_hz and high_hz."""
    return colour(rng.standard_normal(N), spectrum, low_hz, high_hz)


def high_pass(x, order, hz):
    """Butterworth high-pass."""
    return signal.sosfilt(signal.butter(order, hz, "high", fs=SR, output="sos"), x)


def walk(rate):
    """Random levels held 1 / rate s and slewed twice; spread near 1."""
    k = int(SR / rate)
    steps = np.repeat(rng.standard_normal(N // k + 1), k)
    return 1.99 * uniform_filter1d(uniform_filter1d(steps, k), k)[:N]


def ramp(s, length_s):
    """Rises from 0 at s to 1 within length_s."""
    return np.clip((T - s) / length_s, 0, 1)


def play(tables):
    """Columns of several timed tables, and a gate per table that is open while it lasts."""
    s, *columns = np.vstack(tables).T
    gates = [uniform_filter1d(1. * (T >= rows[0][0]) * (T <= rows[-1][0]), size=40) for rows in tables]
    return [np.interp(T, s, column) for column in columns], gates


def ring(x, hz, t60):
    """One damped mode as a complex resonator; noise of rms 1 rings it to rms 1."""
    r = np.exp(-np.log(1000) / (t60 * SR))
    pole = r * np.exp(2j * np.pi * hz / SR)
    return signal.lfilter([np.sqrt(2 * (1 - r * r))], [1, -pole], x).imag


def tone(hz, db, waver):
    """A partial on a moving pitch whose phase and strength waver quickly."""
    phase = 2 * np.pi * np.cumsum(hz) / SR + 0.25 * waver * walk(60)
    return np.sqrt(2) * undb(db + waver * walk(45)) * np.sin(phase)


def repeating(hz, count, change):
    """A random pattern of count points played once a turn; it melts into a new one change times a second."""
    patterns = rng.standard_normal((int(T[-1] * change) + 2, count))
    place = np.cumsum(hz) / SR % 1 * (count - 1)
    return unit(map_coordinates(patterns, [T * change, place], order=1))


def patchy(x, depth_db, rate, middle_db):
    """Treble regions swell and sink on their own; the lower three also follow middle_db."""
    centres = np.log([2000, 3300, 5200, 7500, 10500])  # Hz
    bins, out = rfft(x), np.zeros(N)
    for row in np.eye(len(centres)):
        region = irfft(bins * np.interp(np.log(HZ), centres, row), N)
        out += region * undb(depth_db * walk(rate) + middle_db * sum(row[:3]))
    return out


def add(track, s, sound):
    """Mix a sound into a track at s seconds."""
    i = int(s * SR)
    track[..., i:i + sound.shape[-1]] += sound[..., :N - i]


def scene():
    """Two ports close together hear the air a little apart, plus scatter off ground and trailer."""
    rustle, rumble = handling()
    hits = high_pass(knocks() + ticks() + quiet_tones(), 3, 400)  # small pieces move no bass
    air = rfft(saw() + rustle + scrape() + hits)
    lean = undb(along(PORT_TILT) / 2) * np.exp(.5j * along(PORT_LEAD))
    tail = rng.standard_normal(5000) * np.exp(-T[:5000] / 0.015)
    echo = rfft(tail / np.sqrt(np.sum(tail ** 2)), N) * undb(along(SCATTER))
    ports = np.array([lean + echo, 1 / lean - echo])
    return irfft(air * ports, N) + rumble + bumps()


def record(dry):
    """The camera rounds the loudest peaks and cuts the top steeply with two low-passes."""
    rounded = np.tanh(1.075 * dry) / 1.144
    softened = signal.sosfilt(signal.butter(14, 12300, fs=SR, output="sos"), rounded)
    return signal.sosfilt(signal.ellip(10, .5, 48, TOP_HZ, fs=SR, output="sos"), softened)


dry = scene()
out = record(dry)
file_out(out)
```